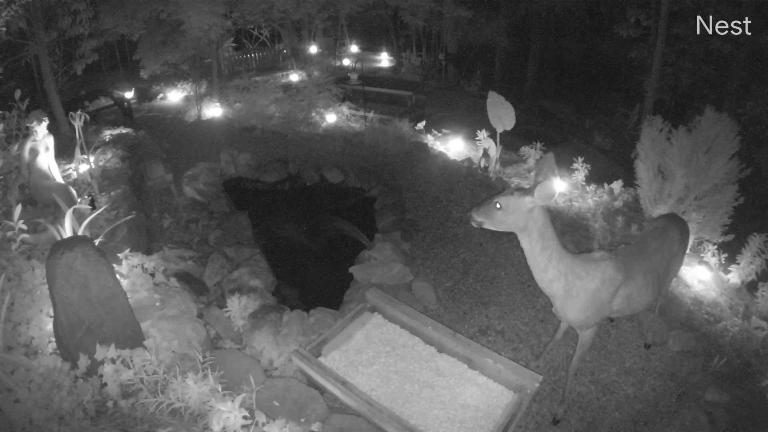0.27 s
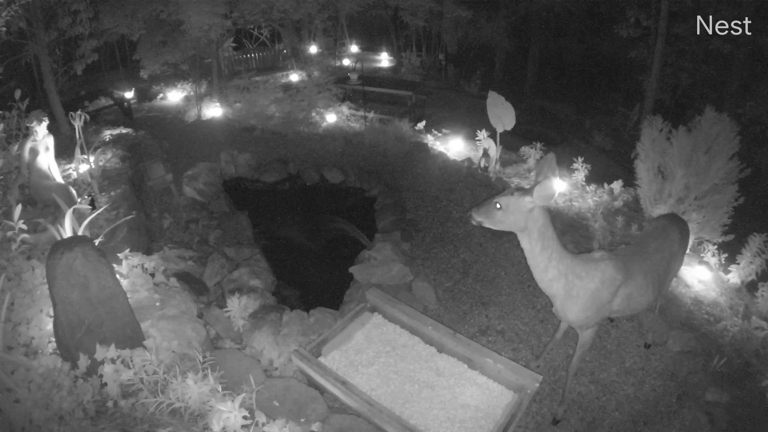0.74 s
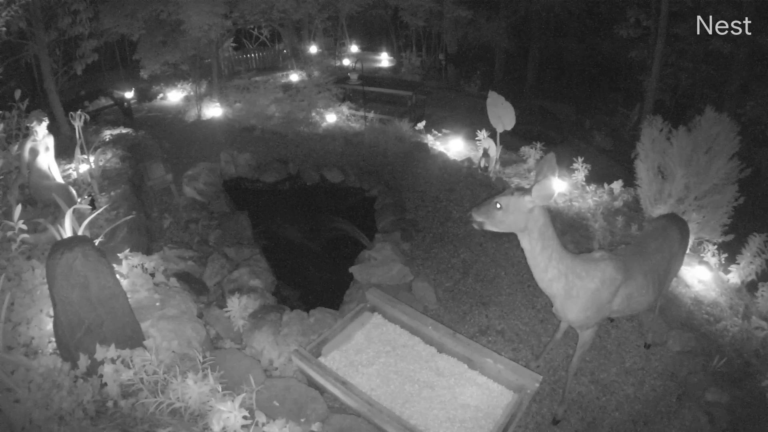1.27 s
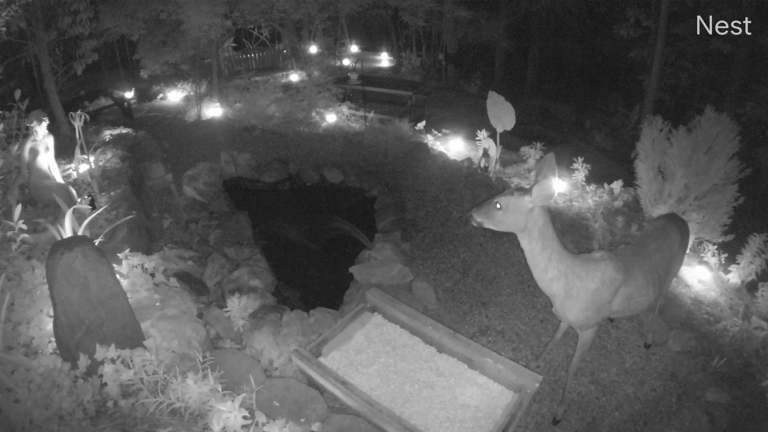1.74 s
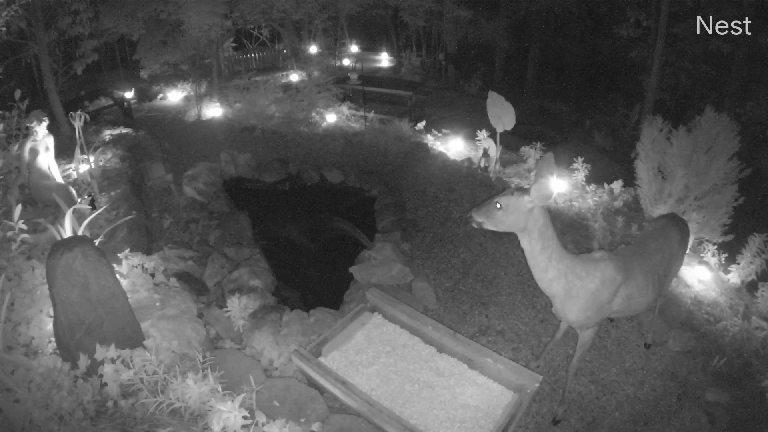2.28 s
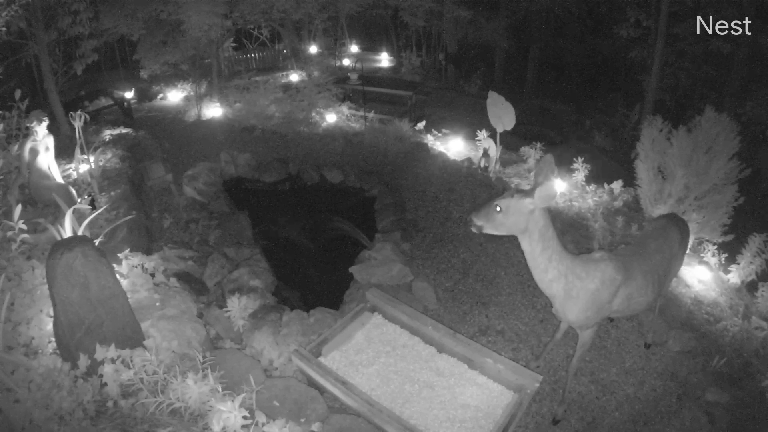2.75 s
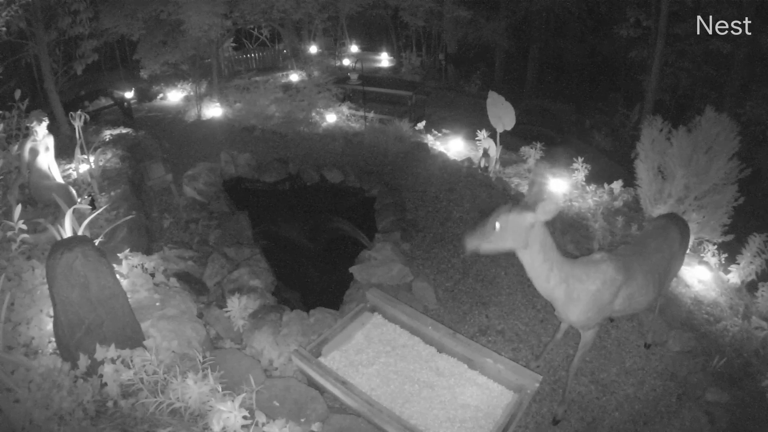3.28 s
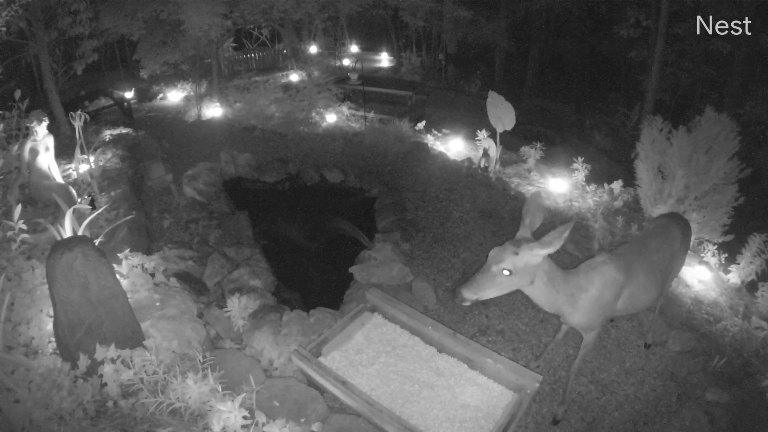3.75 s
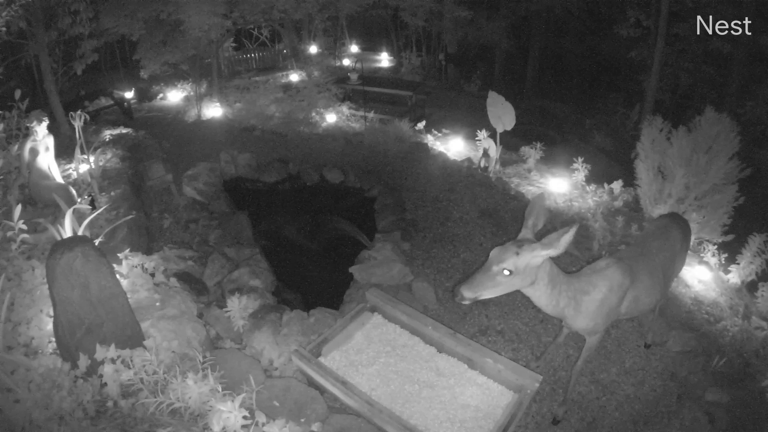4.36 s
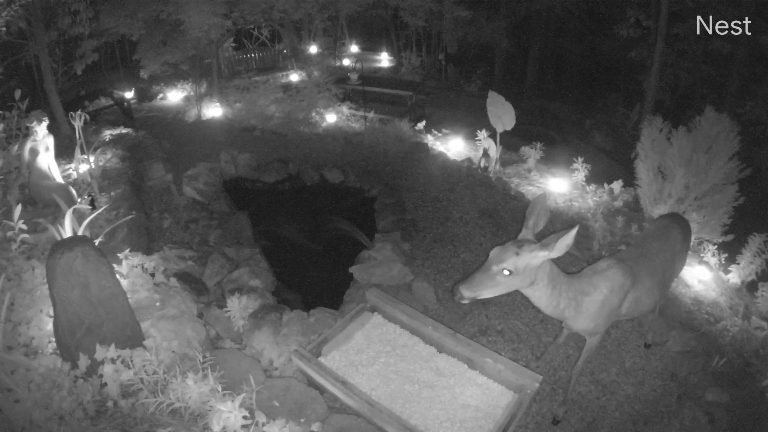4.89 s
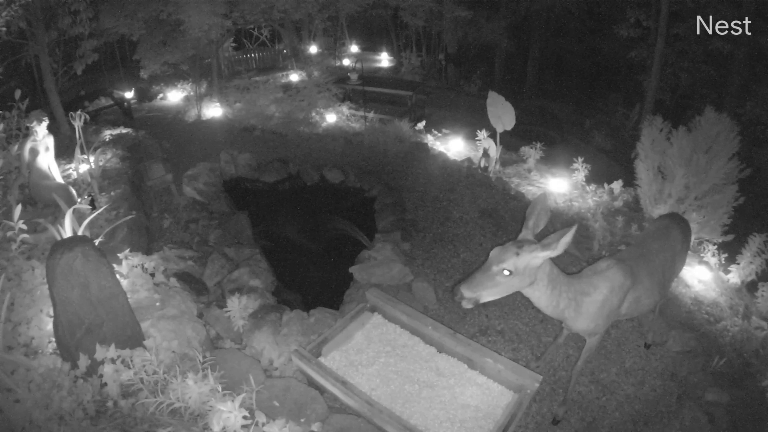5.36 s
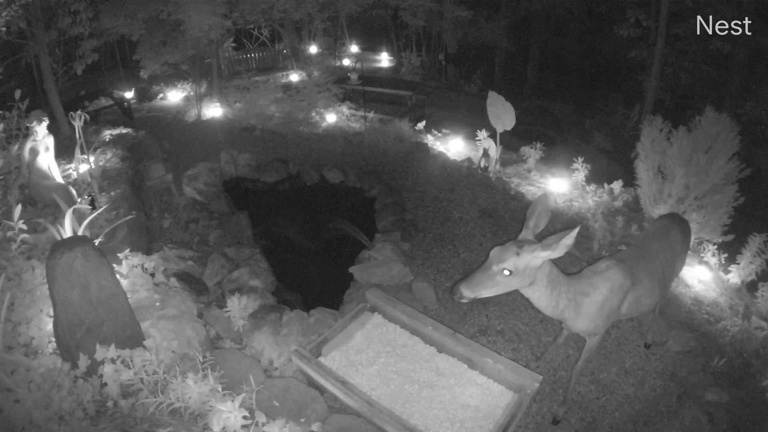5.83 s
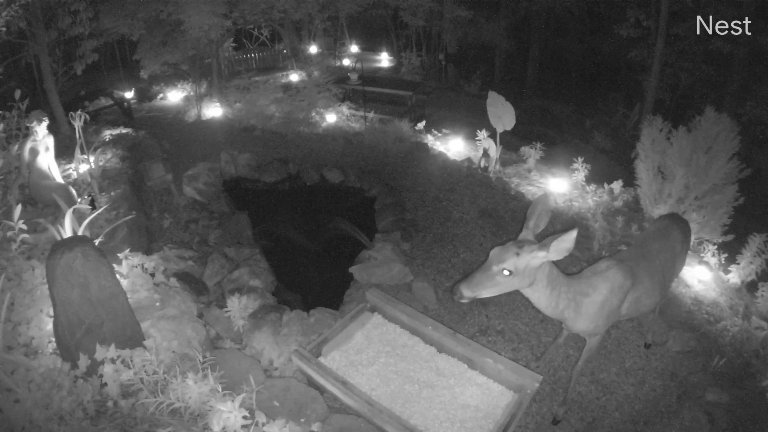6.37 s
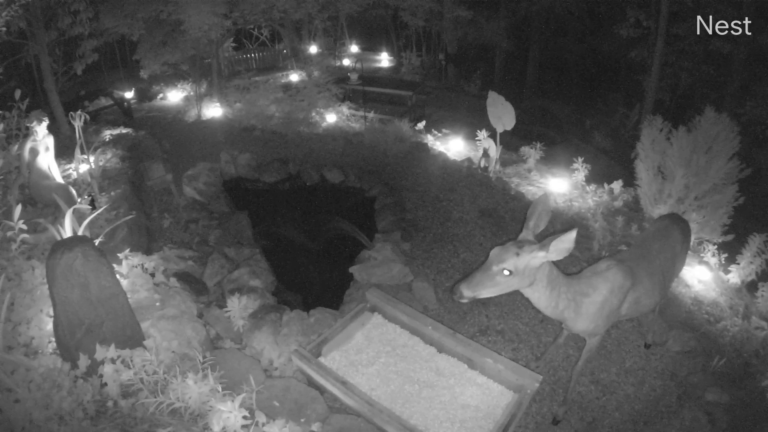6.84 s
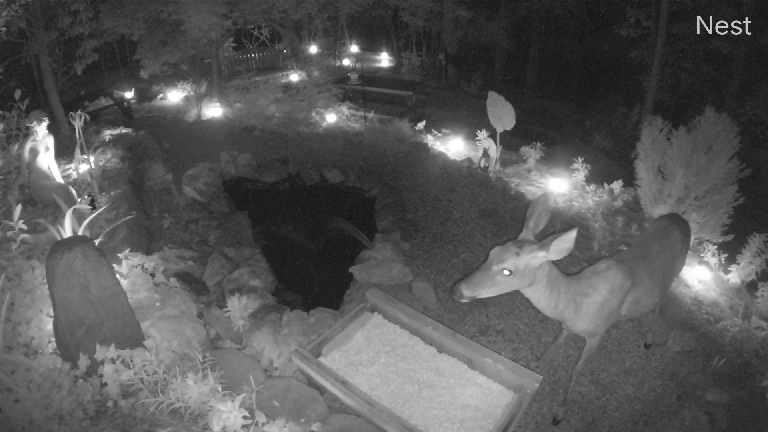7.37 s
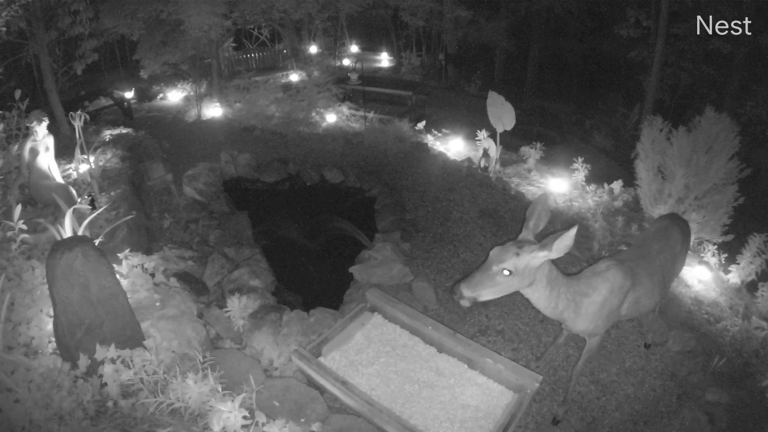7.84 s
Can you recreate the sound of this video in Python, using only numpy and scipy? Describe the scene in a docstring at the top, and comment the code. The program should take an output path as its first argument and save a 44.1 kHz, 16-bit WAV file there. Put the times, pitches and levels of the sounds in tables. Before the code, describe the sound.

Water trickles and plops steadily in a garden pond at night while two close tree frogs trill in overlapping bursts, twice.

```python
"""Tree frogs at a garden pond

Night, heard by an outdoor camera's small microphone. Water trickles and plops all the time: shaped noise
forms the hiss, decaying gliding sines the droplets, and noise bursts with a rising bubble tone the plops.
Two tree frogs close by trill in overlapping turns, twice, and others trill faintly further off: each trill
is a slowing train of three-partial whistles, followed by the echoes of the garden."""
import sys
import numpy as np
from scipy import signal
from scipy.fft import rfft, irfft, next_fast_len
from scipy.io import wavfile
from scipy.ndimage import uniform_filter1d

SR = 44100
rng = np.random.default_rng(int(sys.argv[2]) if len(sys.argv) > 2 else 0)


def generate_wav(signal):
    """Clip the signal to [-1, 1] and save it as 16-bit WAV at the path in sys.argv[1]."""
    frames = np.transpose(np.atleast_2d(signal))
    scaled = np.clip(frames, -1, 1) * 32767
    pcm = np.round(scaled).astype(np.int16)
    wavfile.write(sys.argv[1], SR, pcm)


N = 358091


def undb(db):
    """Decibels: the amplitude ratio is ten to the power of a twentieth of the level."""
    return 10 ** (np.asarray(db) / 20)


def unit(x):
    """Normalisation: the signal is divided by its root mean square."""
    return x / np.sqrt(np.mean(x ** 2))


def add(out, x, s):
    """Superposition: a sound is summed into the output from s seconds on."""
    i = max(int(s * SR), 0)
    out[i:i + len(x)] += x[:max(len(out) - i, 0)]


def bell(size, hz, octaves):
    """Spectral shaping: noise with a bell on a log frequency axis, density 1 at the centre."""
    f = np.maximum(np.fft.rfftfreq(size, 1 / SR), 1)
    gain = np.exp(-(np.log2(f / hz) / octaves) ** 2 / 4)
    return irfft(rfft(rng.standard_normal(size)) * gain, size)


# Reflections from fence and wall. Each row: delay in seconds, level in dB before the whole is normalised.
REFLECTIONS = [(0.0122, -2), (.017, -3.5), (0.03, -4)]
GARDEN_T60_S, SCATTER_TAIL_DB = 0.25, -3  # decay time; tail energy before the whole is normalised


def garden():
    """Reverberation: a few discrete reflections and a decaying diffuse tail from bushes and stones."""
    t = np.arange(SR // 4) / SR
    onset = np.clip(t / 0.0046, 0, 1)
    response = rng.standard_normal(len(t)) * undb(-60 * t / GARDEN_T60_S) * onset
    response *= undb(SCATTER_TAIL_DB) / np.sqrt(np.sum(response ** 2))
    for delay_s, db in REFLECTIONS:
        response[int(delay_s * SR)] += undb(db)
    return response / np.sqrt(np.sum(response ** 2))


PLACES = 8  # spots along the stream where droplets fall, each with its own echo response


def droplets():
    """Bubble resonance: bubbles of every size each ring a few cycles with a rising pitch."""
    per_s, scatter_db, cycles = 900, 3, 12
    places, count = np.zeros((PLACES, N)), per_s * N // SR
    chances = rng.random((count, 3))
    for (when, size, place), loud in zip(chances, rng.standard_normal(count)):
        hz = 250 * 24 ** size
        n = np.arange(int(2 * cycles * SR / hz)) * hz / SR  # time in periods of hz
        envelope = (1 - np.exp(-n)) * np.exp(-3 * n / cycles)
        ring = envelope * np.sin(2 * np.pi * n * (1 + .08 * n / cycles))
        # scaled by hz so that all sizes together have an even spectrum
        add(places[int(place * PLACES)], hz * undb(scatter_db * loud) * ring, when * N / SR)
    return unit(sum(x + undb(8) * signal.fftconvolve(x, garden())[:N] for x in places))


def flicker(x, surge_db=0.5, band_db=0.66, patch_db=5.0, treble_patch_db=8):
    """Random modulation: surges as a whole, flicker in wide bands, and narrow dips, deepest in the treble."""
    f, _, z = signal.stft(x, SR, nperseg=1024)

    def field(bins, frames):
        """Smoothing: twice-averaged noise over frequency and time, standard deviation 1."""
        v = rng.standard_normal(z.shape)
        for _ in range(2):
            v = uniform_filter1d(v, bins, axis=0)
            v = uniform_filter1d(v, frames, axis=1)
        return v / v.std()

    patch_depth = np.interp(f, [3800, 4600], [patch_db, treble_patch_db])[:, None]
    db = surge_db * field(bins=512, frames=2)
    db += band_db * field(bins=20, frames=2)
    db += patch_depth * np.minimum(field(bins=1, frames=5), .8)  # peaks are capped, dips are not
    return unit(signal.istft(z * undb(db), SR, nperseg=1024)[1][:N])


SMALL_PLOPS_PER_S, SMALL_HZ = 2, (350, 3800)  # mean rate and range of centres
SMALL_DB, SMALL_SCATTER_DB, SMALL_OCTAVES = 9, 5, 0.72


def small_plops():
    """Random arrivals: fainter plops at chance moments, as rows like those of the plop table."""
    count = SMALL_PLOPS_PER_S * N // SR
    when, size = rng.random((count, 2)).T
    low, high = SMALL_HZ
    db = SMALL_DB + SMALL_SCATTER_DB * rng.standard_normal(count)
    return list(zip(when * N / SR, db, low * (high / low) ** size, np.full(count, SMALL_OCTAVES)))


# Plops and splashes that stand out. Each row: time in seconds, level in dB against the uncoloured trickle
# before the envelope, centre in Hz, spread in octaves.
LARGE_PLOPS = [(0.041, 16, 2720, 0.072), (0.079, 23, 1200, 0.28), (0.189, 8, 3330, 0.34),
               (0.202, 8, 600, 0.67), (0.351, 12, 3930, 0.11), (.357, 18.5, 652, 0.34),
               (0.5, 15, 591.5, 0.52), (.652, 17, 526, 0.49), (.664, 18, 326, 0.54),
               (0.732, 12, 3350, 0.16), (0.775, 14.5, 4920, 0.42), (0.773, 18, 1800, .12),
               (0.785, 24, 1770, 0.09), (.79, 15, 2300, 0.25), (1.041, 17.5, 5200, 0.18),
               (1.085, 10, 3660, 0.23), (1.169, 16.5, 1493, 0.19), (1.4, 13, 510, 1.2),
               (1.297, 13.5, 4980, 0.37), (1.419, 20.5, 1930, 0.35), (1.19, 10, 3630, 0.32),
               (1.418, 0, 3247, 0.25), (1.65, 18.5, 4720, 0.15), (1.794, 16.5, 2060, 2.5),
               (1.862, 18, 357, 0.52), (2.0363, 12.5, 3060, 0.2), (2.233, 14, 3308, 0.18),
               (2.357, 14, 3460, 0.16), (2.49, 11, 506, 1.3), (2.6135, 21.5, 3470, 0.2),
               (2.6185, 13, 3400, .2), (2.613, 11.5, 3050, 0.57), (2.842, 14, 406.5, 0.72),
               (3.914, 26.5, 821.5, 0.27), (3.965, 13, 452, 0.61), (4.015, 14, 4867, 0.11),
               (4.181, 13.5, 3220, 0.16), (4.227, 11, 3530, 0.19), (4.395, 17, 385.8, 0.44),
               (4.797, 12, 3050, 0.83), (4.8, 13, 922, 0.19), (4.955, 13, 3700, 0.19),
               (5.144, 17.5, 1501, 0.18), (5.191, 23, 860, 0.2), (5.392, 11, 3032, 0.19),
               (5.426, 14, 890, 0.28), (5.695, 10, 940, 0.22), (5.327, 17.5, 760, 0.29),
               (5.774, 16.5, 3140, 0.4), (5.816, 11.5, 2690, 0.68), (6.143, 13, 2920, 0.34),
               (6.208, 21, 317, 0.32), (6.349, 8, 3300, 0.28), (6.586, 12, 3357, 0.17),
               (7.484, 12, 3476, 0.18), (7.536, 19, 437, 0.29), (7.571, 20, 922, 0.12),
               (7.617, 13, 3521, 0.24), (7.98, 13, 5000, 0.29)]
# the fall lasts a fixed time plus a few cycles of the centre
PLOP_RISE_S, PLOP_FALL_S, PLOP_CYCLES = .0009, .0065, 2.66
BUBBLE_DB, BUBBLE_GLIDE_PER_S = -11.5, 7.5  # tone amplitude against splash RMS; pitch rise as a share


def plops():
    """Impact and cavity resonance: a quick splash in one band and trapped air ringing upward from its centre."""
    out, t = np.zeros(N), np.arange(2048) / SR
    for s, db, hz, octaves in LARGE_PLOPS + small_plops():
        envelope = (1 - np.exp(-t / PLOP_RISE_S)) * np.exp(-t / (PLOP_FALL_S + PLOP_CYCLES / hz))
        splash = bell(size=2048, hz=hz, octaves=octaves)
        tone = np.sin(2 * np.pi * hz * (t + BUBBLE_GLIDE_PER_S * t ** 2 / 2))
        bubble = undb(BUBBLE_DB) * splash.std() * tone
        add(out, undb(db) * envelope * (splash + bubble), s - .004)  # starts 4 ms ahead of the listed time
    return out


# Colour of the water. Each row: frequency in Hz, spectral gain in dB before the flow gain.
WATER_COLOUR = [(88, -69), (150, -60.5), (226, -32), (445, -27.5), (537, -24), (1100, -13.5), (1280, -12.5),
                (2400, -10), (3150, -2), (4200, -8), (4450, -18.5), (4950, -12.5), (5500, -13),
                (5750, -20.5), (6750, -16.5), (7550, -31), (7800, -54.5), (8730, -47), (11300, -69.5),
                (19200, -120)]
# Strength of the flow. Each row: time in seconds, gain of all the water sound in dB.
FLOW_GAIN = [(0, -30.5), (1.4, -32), (1.85, -33.5), (2.3, -31), (3.1, -31.5), (3.7, -31.5), (4.301, -31),
             (5.0, -31.5), (5.7, -31.5), (6.35, -32), (7.15, -31), (8.12, -32)]


def water():
    """Linear filtering: hiss, droplets and plops all take the colour of the trickle."""
    trickle = flicker(undb(-1) * rng.standard_normal(N) + undb(-4) * droplets())
    white = trickle + plops()
    hz, db = np.transpose(WATER_COLOUR)
    size = next_fast_len(N)
    f = np.maximum(np.fft.rfftfreq(size, 1 / SR), 1)
    colour = undb(np.interp(np.log(f), np.log(hz), db))
    coloured = irfft(rfft(white, size) * colour, size)[:N]
    s, flow_db = np.transpose(FLOW_GAIN)
    return coloured * undb(np.interp(np.arange(N) / SR, s, flow_db))


# The frogs. Each row: pitch in Hz, length factor of the upper partials, level in dB, fundamental in dB,
# third partial in dB (both against the second), swell in seconds, echo in dB, lag of the upper partials in ms.
FROG_BODIES = [(1202.8, 0.95, -33, 0.5, -7, 0.061, -6, 0), (1335, 1.87, -32.5, -6, -12.5, 0.12, -4, 0.66),
               (1212, 0.71, -46.5, -13.5, -5, 0.035, 0.5, 1), (1330, 2.6, -60, -9, -11, 0.052, 7.5, 0.75),
               (1227, 0.44, -50, -8, -18, 0.12, 6, 0)]
# Voice of each frog. Each row: climb within a pulse as a share of pitch per second, rasp from 0 to 1.
FROG_VOICES = [(12, .2), (10.5, .7), (11, .5), (8, .6), (11, .5)]
# Partials of one pulse. Each row: multiple of the pitch, peak delay in ms before the frog's lag,
# rise in ms, fall in ms (for upper partials before the frog's length factor).
PULSE_PARTIALS = [(1, 5, 2.85, 1.1), (2, 0.4, 4.1, 2.65), (3, 0.81, 3.8, 1.1)]
SCATTER_S, SCATTER_DB, SCATTER_PITCH = .0004, 1.3, .012  # pulse to pulse: timing, level, share of pitch
RASP_HZ = 165  # mean throb inside a pulse


def trill(start, end, rate0, rate1, frog):
    """Pulse train of harmonics: short rising whistles of three partials repeat at a gliding rate."""
    hz, length, db, low_db, third_db, swell, echo_db, lag = FROG_BODIES[frog]
    climb, rasp = FROG_VOICES[frog]
    out, tau = np.zeros(N), np.arange(-SR // 60, SR // 60) / SR
    fade = signal.windows.tukey(len(tau), .5)
    span = end - start
    grid = np.linspace(0, span, 512)
    # the rate integrates to a pulse count; a pulse falls on each whole number
    beats = rate0 * grid + (rate1 - rate0) * grid ** 2 / (2 * span)
    times = np.interp(np.arange(int(beats[-1]) + 1), beats, grid)
    chances = rng.standard_normal((len(times), 5)) * (SCATTER_S, SCATTER_DB, SCATTER_PITCH, 1, 1)
    for s, (late, loud, tune, turn, throb) in zip(times, chances):
        phase = 2 * np.pi * (hz * (1 + tune) * (tau + climb * tau ** 2 / 2) + turn)
        # roughens the upper partials
        buzz = 1 + rasp * np.cos(2 * np.pi * RASP_HZ * (1 + 0.13 * throb) * tau + throb)
        # the vocal sac fills over the first pulses, and the upper partials come in last
        effort = 1 - 0.65 * np.exp(-(s / swell) ** 2)
        pulse = 0
        for (k, peak, rise, fall), part_db in zip(PULSE_PARTIALS, (low_db, 0, third_db)):
            upper = k > 1
            u = tau * 1000 - peak  # ms from the peak
            if upper:
                u = (u - lag) / length
            shape = np.exp(-.5 * (u / np.where(u < 0, rise, fall)) ** 2)
            if upper:
                shape = shape * buzz
            strength = undb(part_db) * effort ** (1.21 if upper else 1)
            pulse = pulse + strength * shape * np.sin(k * phase)
        add(out, undb(db + loud) * pulse * fade, start + s + late + tau[0])
    return out + undb(echo_db) * signal.fftconvolve(out, garden())[:N]


# The trills. Each row: first pulse in seconds, end in seconds, pulses per second at the start,
# pulses per second at the end, index of the frog.
TRILL_TURNS = [(0.010, .760, 47, 44, 3), (0.120, .800, 46, 43, 2), (2.8795, 3.548, 46.8, 41.34, 0),
               (3.0736, 3.724, 48.9, 43.9, 1), (4.280, 4.960, 46, 43, 2), (5.350, 5.860, 46, 43, 4),
               (6.6145, 7.270, 45.9, 42.2, 0), (6.7918, 7.334, 49.3, 43.7, 1)]


def chorus():
    """Superposition: the trills of all the frogs add up."""
    return sum(trill(*row) for row in TRILL_TURNS)


HOLLOW_HZ, HOLLOW_FROM_DB = (3020, 3330), -35.5  # the band, and the trill level that empties it fully


def hollow(x, frogs):
    """Level-dependent band rejection: the band between second and third partials falls quiet in loud trills."""
    loud = np.sqrt(np.maximum(uniform_filter1d(frogs ** 2, size=4410), 0))  # RMS over 0.1 s
    share = np.clip(loud / undb(HOLLOW_FROM_DB), 0, 1) ** 4
    band_filter = signal.butter(3, HOLLOW_HZ, "bandpass", fs=SR, output="sos")
    return x - share * signal.sosfiltfilt(band_filter, x)


def scene():
    """Superposition: water and frogs add up, with the hollow band under loud trills."""
    frogs = chorus()
    return hollow(water() + frogs, frogs)[None]


TOP_HZ = 8850


def record(dry):
    """Band limiting: a steep elliptic low-pass is the camera's cut-off."""
    return signal.sosfilt(signal.ellip(8, .2, 70, TOP_HZ, fs=SR, output="sos"), dry)


dry = scene()
out = record(dry)
generate_wav(out)
```